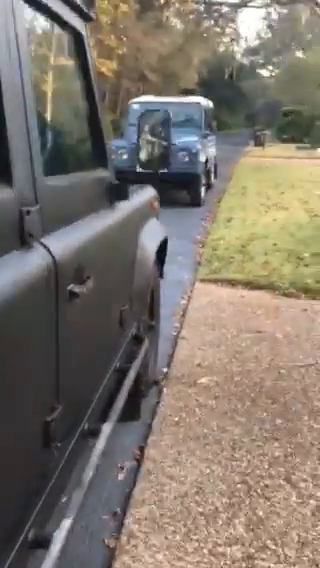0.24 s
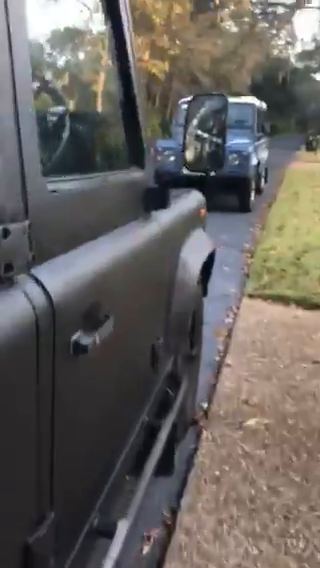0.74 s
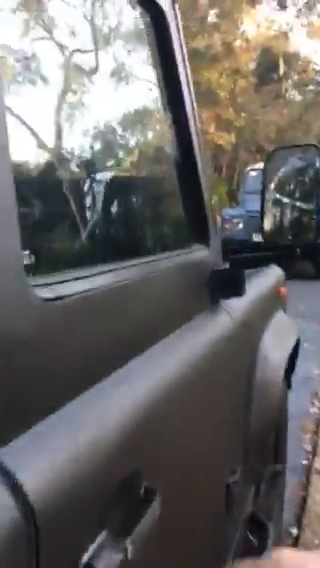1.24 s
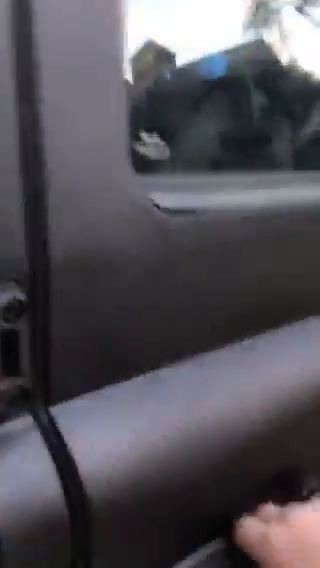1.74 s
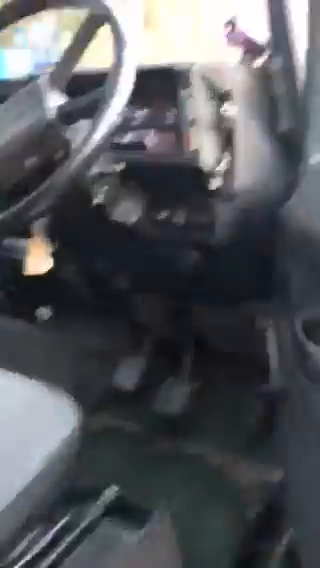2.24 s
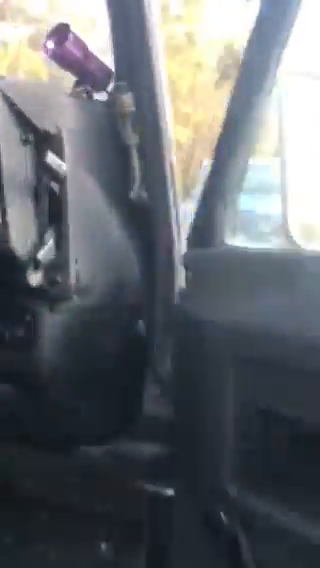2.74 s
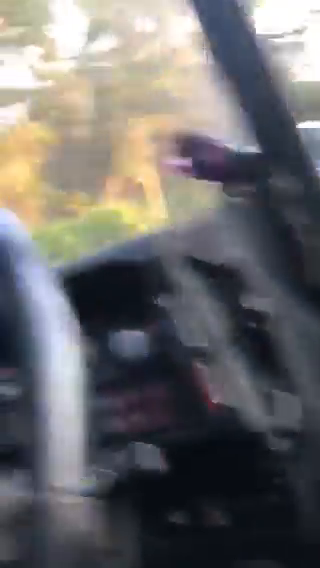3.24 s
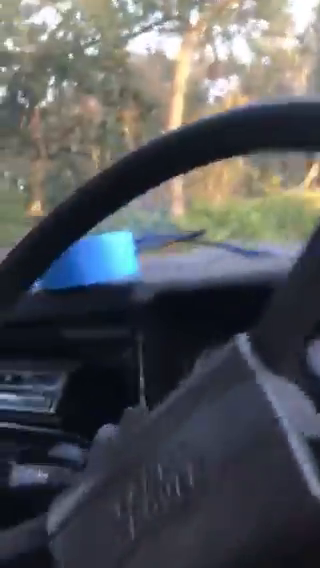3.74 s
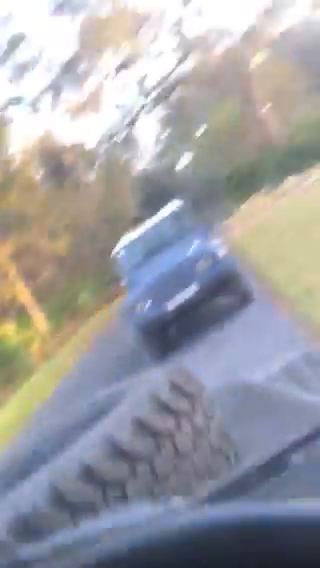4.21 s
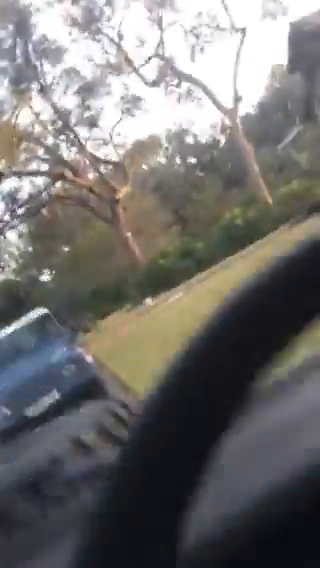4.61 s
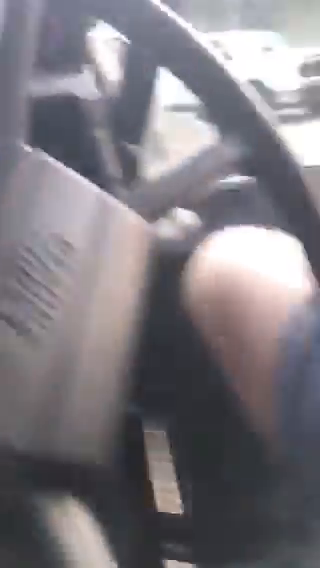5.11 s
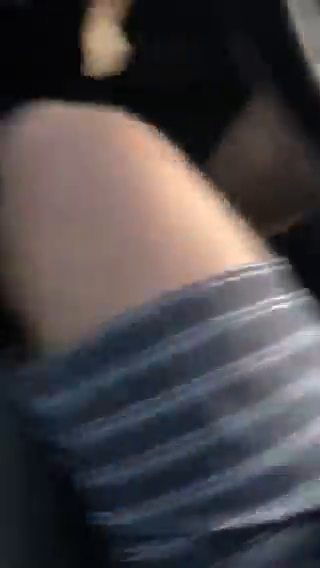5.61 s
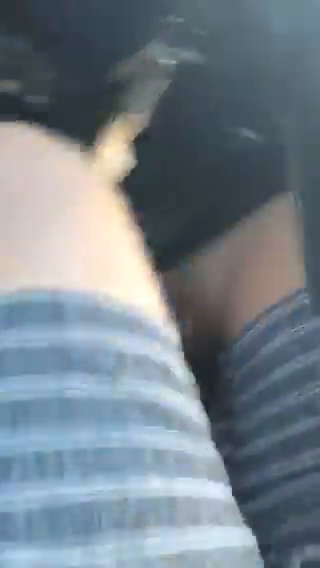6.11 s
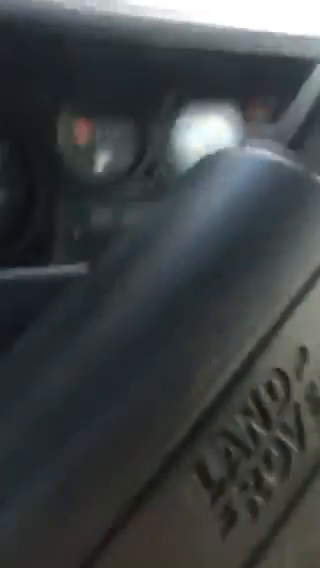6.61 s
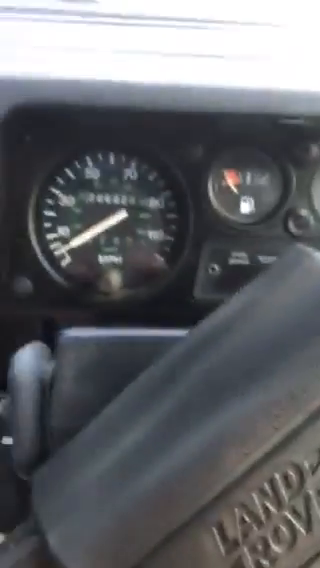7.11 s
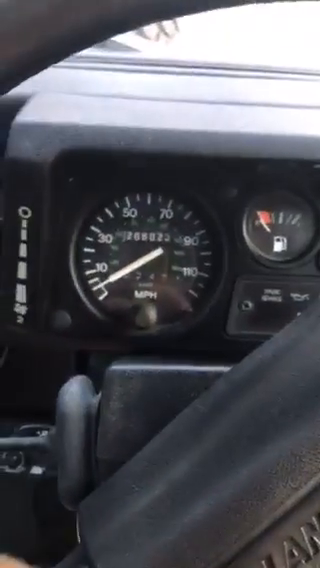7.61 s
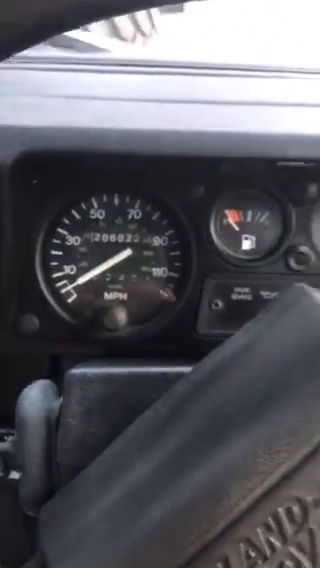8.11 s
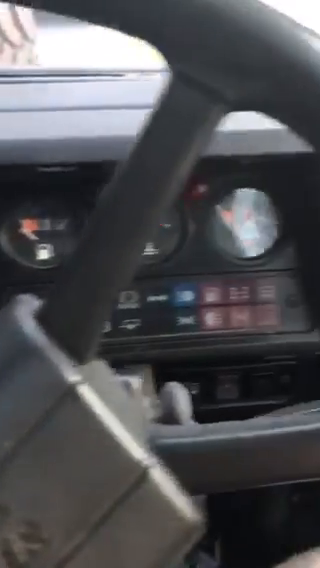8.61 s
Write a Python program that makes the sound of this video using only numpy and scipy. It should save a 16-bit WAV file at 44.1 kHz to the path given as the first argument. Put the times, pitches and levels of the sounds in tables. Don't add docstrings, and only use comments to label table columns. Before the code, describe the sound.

Handle clicks, latch clack, seat creaks and deep body thuds lead to a booming, rattling car door slam, then quiet cabin rumble.

```python
import sys
import numpy as np
from scipy import signal
from scipy.fft import rfft, irfft
from scipy.io import wavfile
from scipy.ndimage import uniform_filter1d

SR = 44100
rng = np.random.default_rng(int(sys.argv[2]) if len(sys.argv) > 2 else 0)


def decibels_to_gain(level_db):
    exponent = np.asarray(level_db, float) / 20
    return 10 ** exponent


def transcribe(u):
    v = np.clip(np.atleast_2d(u).T, -1, 1)
    q = np.round(v * 32767).astype(np.int16)
    wavfile.write(sys.argv[1], SR, q)


N = 390417
TIME = np.arange(N) / SR

# time in s, firing rate in Hz, level in dB, favoured harmonic (number).
ENGINE_DRONE = [(0, 38.3, -59.5, 3.7), (1.2, 38.26, -49, 2.2), (2.3, 37.93, -51, 2.5),
                (3.0, 36.92, -52.5, 3.13), (3.8, 40.24, -51, 2.8), (4.5, 39, -67.5, 1.14),
                (6.9, 38, -52.5, 1.63), (7.2, 37.4, -48, 1.97), (7.7, 37.68, -46, 2.47),
                (8.1, 37, -47, 2.35), (8.4, 35.25, -55.5, 2), (8.85, 32.15, -53, 2.58)]
OFF_RESONANCE_DB = -12

# time in s, level in dB.
ROAD_HISS = [(0.0, -53), (.49, -53.5), (1.08, -55), (1.85, -53), (2.56, -56.5), (2.98, -55), (3.72, -59.5),
             (4.26, -55.5), (4.51, -60.5), (4.88, -55.5), (5.4, -61.5), (5.84, -60.5), (6.16, -50),
             (6.28, -60.5), (6.6, -65), (7.05, -65.5)]
# frequency in Hz, density in dB per Hz.
TYRE_SPECTRUM = [(150, -38.5), (260, -5), (416, -2.5), (471, -7), (513, -3), (801, 1), (1210, -3.5),
                 (1360, -4), (2130, -15.5), (5000, -38), (6500, -64), (11000, -120)]
# frequency in Hz, density in dB per Hz.
RUMBLE_SPECTRUM = [(11, -64.5), (18, -28), (40, -2), (70, 0), (125, -13.5), (165, -15.5), (220, -20.5),
                   (300, -41.5), (420, -67.5)]
# time in s, level in dB.
BODY_RUMBLE = [(0, -57), (1.8, -50.5), (2.9, -48.5), (3.7, -56), (4.4, -51.5), (5.0, -47.5), (5.4, -60),
               (6.5, -46.5), (7.0, -59.5), (8.1, -60.5), (8.85, -55)]
# frequency in Hz, density in dB per Hz.
STILL_SPECTRUM = [(150, -29), (250, -6), (400, -5), (800, -4), (1400, -10), (2000, -14.5), (5000, -18.5),
                  (15100, -24), (16500, -36)]
DEEP_DB, STILL_DB = -49, -70.5
SHUDDER_S, SHUDDER_POWER, SHUDDER_DEEP_DB, SHUDDER_UPPER_DB = 0.12, 0.57, -29, -33

# peak time in s, rise in s, fall in s, level in dB, brightness in dB.
CLOTH_STROKES = [(.001, .1, 0.21, -70, -1), (.5, 0.35, 0.37, -73, -0.5), (1.15, 0.16, 0.24, -67, 0.5),
                 (1.75, 0.26, .15, -67, -2.5), (2.03, 0.51, 0.57, -67, -0.5), (2.98, 0.27, 0.2, -57.5, 4.5),
                 (3.47, 0.31, 0.28, -63, 4.5), (4.2, 0.26, 0.34, -60, 0.5), (4.65, 0.23, 0.6, -64.5, 1.5),
                 (4.97, 0.11, 0.12, -63, 6), (5.15, 0.1, 0.06, -62.5, 5.5), (5.29, 0.15, .12, -67.5, 8),
                 (5.62, 0.24, 0.95, -67.5, 4), (6.03, 0.19, 0.23, -53, -6), (6.5, 0.23, 0.4, -67, 2),
                 (6.79, 0.18, .17, -63, 2.5)]
# frequency in Hz, density in dB per Hz.
CLOTH_SPECTRUM = [(710, -33), (1200, -17), (1700, -2.5), (1920, -0.5), (2980, -2.5), (5160, -5.5),
                  (6150, -10), (6940, -7.5), (7660, -10.5), (8640, -7.5), (14300, -9.5), (16000, -12),
                  (16500, -41.5)]
STROKE_EDGE_DB, STROKE_POWER, FIDGET_DB, FIDGET_TOP_DB = -16, 2.05, -73.5, -81.5

# start in s, end in s, pitch in Hz, level in dB, half width as share of pitch.
SPRING_CREAKS = [(3.775, 3.825, 2030, -52.5, .03), (3.83, 3.91, 2780, -50, 0.013),
                 (3.79, 3.88, 5350, -57.5, .015), (3.92, 4.08, 2640, -55, .022),
                 (4.17, 4.36, 1950, -56, .08), (4.24, 4.37, 900, -52, .08), (4.52, 4.72, 2000, -58, .07),
                 (3.92, 4.0, 1950, -54, .04), (3.82, 3.86, 926, -48.5, 0.027), (3.81, 3.9, 1410, -49, .04),
                 (3.83, 3.9, 2310, -50, .04), (3.81, 3.9, 3650, -60, .04), (3.77, 3.9, 657, -49.5, .08),
                 (3.83, 3.92, 1800, -52, .05), (4.15, 4.39, 280, -54, .08), (2.82, 3.04, 1950, -55, 0.061),
                 (2.94, 3.06, 5200, -53, .08), (4.92, 5.0, 2050, -56, 0.054),
                 (3.79, 3.9, 8100, -61.5, 0.056), (3.79, 3.9, 12500, -63, .05),
                 (2.95, 3.03, 2600, -55, .06), (8.745, 8.84, 590, -60.5, 0.037)]

# frequency in Hz, level in dB, t60 in s.
HANDLE = [(385, -2, 0.06), (680, -8, 0.05), (894, -17, .08), (1100, -8, .06), (1485, -12, .045),
          (1868, -15, .035), (2229, -11, .045), (2450, -12, .02), (3140, -11.5, .04)]
# frequency in Hz, level in dB, t60 in s.
BOLT = [(262, -1, .075), (590, -9, 0.059), (850, -17, .05), (1122, -13, .05), (1400, -15.5, .04)]
# frequency in Hz, level in dB, t60 in s.
SILL = [(800, -7.5, .06), (1115, -4, .03), (1730, -2.5, .028), (2150, -13, .025), (3820, -17, .03)]
# frequency in Hz, level in dB, t60 in s.
STEP = [(826, -0.5, 0.035), (1145, -5.5, 0.022), (1575, -3, 0.032), (2150, -9.5, .03), (4021, -11, 0.034),
        (4888, -16, .03), (5600, -17, .02)]
# frequency in Hz, level in dB, t60 in s.
COLUMN = [(298, -1, 0.052), (502, -6.5, .05), (670, -1.5, 0.052), (940, -12, 0.042), (1310, -14.5, .045),
          (1950, -22, .03)]
# frequency in Hz, level in dB, t60 in s.
SEAT_BASE = [(200, -1, .09), (384, -12, 0.0695)]
# frequency in Hz, level in dB, t60 in s.
CLIP = [(1760, -0.5, 0.041), (2054, -4, 0.026), (3700, -16, .04)]
# frequency in Hz, level in dB, t60 in s.
SEAT_TRIM = [(348, -1, 0.097), (453, -5.5, .06), (247, -7, 0.071)]
# frequency in Hz, level in dB, t60 in s.
BUCKLE = [(190, -2, .07), (330, 0, .05), (460, -2, .05), (650, -4, .045), (920, -6, .04), (1200, -9, .04)]
# frequency in Hz, level in dB, t60 in s.
DASH = [(589, -3, 0.074), (1150, -9, .04), (2000, -9.5, .03), (2560, -15, .02)]
# start in s, peak in dB, push in s, modes of the part struck.
BLOWS = [(1.876, -28, .0006, HANDLE), (1.8793, -19, 0.00055, HANDLE), (1.9946, -25, 0.00093, BOLT),
         (1.999, -21.5, 0.00085, BOLT), (3.113, -35, 0.00057, SILL), (3.1943, -38, 0.00032, STEP),
         (3.4155, -39.5, .0005, STEP), (3.066, -38.5, 0.00089, BOLT), (4.5755, -29, .001, COLUMN),
         (4.5786, -26.5, 0.0018, COLUMN), (4.642, -43.5, .0006, SILL), (5.73, -27.5, 0.0035, SEAT_BASE),
         (6.728, -30, .0015, BUCKLE), (6.627, -44, .002, BUCKLE), (6.036, -20, .003, COLUMN),
         (5.981, -24, .003, COLUMN), (8.785, -59.5, 0.0029, DASH), (8.818, -63, .004, DASH),
         (1.9335, -40.5, .001, CLIP), (1.966, -45, .003, CLIP), (5.286, -38.5, .004, SEAT_TRIM),
         (5.326, -39.5, 0.0035, SEAT_TRIM), (2.7835, -46, .001, STEP)]
# start in s, peak in dB, low edge in Hz, high edge in Hz.
CATCH_SNAPS = [(6.6072, -16, 1220, 4040), (6.7305, -36, 1200, 5800), (6.8155, -43, 900, 3500),
               (3.4175, -35, 760, 2400), (3.196, -38, 700, 4900), (1.4935, -40, 12000, 14000),
               (1.5135, -39, 11500, 14500), (1.539, -37, 5500, 9000), (1.81, -37.5, 10000, 11000),
               (1.829, -38, 8500, 12000), (5.5405, -43, 2000, 7000), (1.2058, -40, 1500, 7600),
               (2.0953, -42, 2000, 7000), (2.1611, -40, 2500, 7000), (2.189, -32, 2800, 7100),
               (4.3, -48, 1200, 3500), (4.644, -40, 900, 4000), (5.5854, -44, 1500, 6000),
               (5.8103, -42.5, 3300, 4400), (6.2483, -40, 1500, 6000), (3.9005, -41, 3500, 8000)]

# start in s, peak in dB, ring in Hz.
BRIGHT_TICKS = [(.033, -40.5, 4300), (1.136, -39.5, 2020), (1.9879, -33.5, 4000), (2.126, -33, 1620),
                (2.162, -35.5, 3730), (2.1872, -26.5, 4160), (2.2127, -37, 1840), (2.6833, -45.5, 4200),
                (2.774, -38, 4300), (3.8092, -55, 2040), (4.1465, -43, 2380), (4.3395, -39, 2000),
                (4.57, -39, 1650), (5.586, -40.5, 2720), (5.7385, -46, 1520), (5.7548, -46.5, 6500),
                (5.7704, -41, 4100), (5.77, -44, 6800), (6.5331, -46, 4000), (6.599, -36, 2180),
                (6.6294, -38, 1570), (6.7044, -53, 4090)]
# start in s, peak in dB, ring in Hz.
DULL_TICKS = [(1.032, -42, 1760), (1.205, -37.5, 2000), (1.5998, -44, 1540), (2.095, -36.5, 2377),
              (2.7107, -45, 1730), (2.8125, -36, 4070), (3.2229, -45, 1840), (3.426, -41, 1600),
              (3.7864, -45, 2080), (3.9042, -30, 2070), (4.7416, -33.5, 2070), (5.809, -41, 3900),
              (5.821, -43.5, 3860)]
TICK_T60_S, BRIGHT_TOP_DB, DULL_TOP_DB, RATTLE_TOP_DB = 0.035, -8, -20, -10
# start in s, peak in dB, ring in Hz, t60 in s, top octaves in dB.
CLACKS = [(1.4916, -32.5, 2760, .072, -3), (1.5044, -29.5, 2830, .09, -10), (1.518, -28, 1830, 0.066, -5.5),
          (1.528, -33, 2920, .04, -18), (1.5385, -28, 2630, 0.018, -12), (1.8086, -25.5, 3230, 0.051, -4.5),
          (1.826, -25.5, 3080, 0.045, -7.5), (1.8787, -26, 4200, 0.046, -12), (1.897, -36, 3600, .08, -8),
          (1.93, -39, 4000, .09, -8), (1.8, -40, 3500, .05, -15), (2.0006, -25, 2950, .054, -9),
          (2.0212, -16, 4070, 0.025, 3.5), (2.0215, -29, 1400, .04, -30), (2.031, -24, 4200, .03, 0),
          (5.5398, -39, 3850, 0.012, -6), (6.6066, -29, 3300, 0.015, -22), (6.7276, -30.5, 1040, .04, -10)]
# start in s, peak in dB, ring in Hz, t60 in s.
SLAM_RATTLES = [(5.9696, -19, 2000, .07), (5.971, -21, 4500, .1), (5.976, -21, 2700, .08),
                (5.9924, -12, 3400, .05), (5.9965, -12, 2300, .06), (6.0041, -14, 2100, .05),
                (6.011, -13, 3000, 0.04), (6.016, -12, 3600, .04), (6.028, -11.5, 4460, .04),
                (6.035, -18.5, 3500, .05), (6.0474, -20, 2890, 0.11), (6.073, -22, 4300, 0.11),
                (6.074, -23, 2300, .04), (6.109, -26.5, 3270, 0.073), (6.141, -33, 3500, 0.14),
                (6.156, -39, 3000, .1), (6.2, -45, 3000, .06), (6.247, -35, 3070, 0.22),
                (6.2802, -34.5, 2750, 0.094), (6.305, -39.5, 3000, 0.066)]
# frequency in Hz, width in Hz, level in dB.
LATCH_BANDS = [(8800, 1100, 1.5), (11450, 600, -4.5), (14670, 200, -4.5)]
# start in s, peak in dB, t60 in s.
LATCH_HITS = [
    (2.021, -26.5, .028),
    (2.031, -35, .03),
    (5.993, -36, .05),
    (6.013, -36.5, .06),
]

# start in s, peak in dB, upper ring in Hz, upper level in dB.
SKIN_KNOCKS = [(2.049, -39.5, 760, -20), (2.189, -33.5, 1327, -6), (2.783, -39, 692, -0.5),
               (4.91, -47, 806, 4.5), (5.557, -37.5, 553, -7), (5.745, -36.5, 420, -5),
               (5.992, -10, 1140, -12), (6.013, -9.5, 747, -4.5), (6.039, -12.5, 744, -3.5),
               (6.073, -19.5, 898, -6), (6.1, -25, 880, -15), (6.602, -28, 1350, -12)]
# start in s, peak in dB, upper ring in Hz, upper level in dB.
TRIM_KNOCKS = [
    (1.505, -29, 700, -6),
    (1.826, -30.5, 1350, -4),
    (3.898, -29, 707, -12),
    (5.593, -30.5, 947, -33),
    (5.97, -23, 696, 5.5),
    (6.629, -49, 875, -22),
]
# start in s, peak in dB, upper ring in Hz, upper level in dB.
PLASTIC_KNOCKS = [
    (6.251, -48, 1100, -2),
]
SKIN_HZ, SKIN_T60_S = 270, 0.069
TRIM_HZ, TRIM_T60_S = 380, 0.07
PLASTIC_HZ, PLASTIC_T60_S = 470, 0.06

# start in s, peak in dB, pitch in Hz, t60 in s.
AIR_PUSHES = [
    (1.872, -34.5, 47, 0.34),
    (2, -45, 45.4, 0.67),
    (6.75, -38, 42, 0.95),
    (5.99, -17.5, 32, .6),
]

# start in s, peak in dB, panel in Hz, t60 in s, overtone in dB.
FLOOR_THUDS = [(2.792, -54, 67.3, .95, 16.5), (3.068, -42.5, 58.9, 0.21, -26), (3.9, -14.5, 89, 0.25, -9),
               (3.913, -13, 74.6, 0.34, 4), (3.945, -22.5, 76.5, 0.28, 2.5), (3.981, -33, 69.7, 0.41, 8.5),
               (5.109, -21.5, 63.8, 0.908, -15.5), (5.289, -11.5, 69.5, 0.56, -7),
               (5.33, -19, 86.7, .16, -7), (5.366, -32.5, 74.3, 0.53, 0.5), (5.558, -27, 99, .43, -6.5),
               (5.581, -31, 102, .16, 2.5), (5.604, -31.5, 69.4, 0.298, -11.5),
               (5.734, -16, 76.3, 0.17, -11), (5.809, -31.5, 72.4, 0.44, -17),
               (6.734, -38.5, 99.6, 0.7, 11.5), (8.775, -49, 90, .5, 3)]
# start in s, peak in dB, panel in Hz, t60 in s, overtone in dB.
DOOR_THUDS = [
    (1.873, -31, 93, 0.16, 4),
    (1.993, -31, 99, 0.18, 9),
    (2.049, -34.5, 101, 0.16, 5.5),
    (2.576, -47, 66.3, 0.32, 7),
    (2.829, -44, 109.8, 0.4, 9.5),
    (6.605, -29.5, 71.4, 0.053, 7.5),
    (6.765, -39, 94, 0.54, 4.5),
]
# start in s, peak in dB, panel in Hz, overtone in Hz.
SLAM_THUDS = [
    (5.974, -15.5, 61, 130),
    (5.993, -18.5, 70, 172),
    (6.007, -8, 69, 135),
    (6.035, -11, 53.5, 110),
    (6.055, -12, 58, 175.5),
    (6.16, -24.5, 58.8, 136),
    (6.282, -29, 57.8, 145),
]
FLOOR_OVER_HZ, DOOR_OVER_HZ = 126.6, 195
SLAM_T60_S, SLAM_OVER_DB, SLAM_DULLS_DB_PER_S = 0.36, 0, 76

TOP_HZ = 15900
PORT_DIP_HZ, PORT_DIP_Q, PORT_DIP_SHARE = 10370, 18, 0.39


def band(x, lo_hz, hi_hz, order=2):
    return signal.sosfilt(signal.butter(order, [lo_hz, min(hi_hz, 0.45 * SR)], "band", fs=SR, output="sos"), x)


def split(x, edge_hz):
    return [signal.sosfilt(signal.butter(4, edge_hz, kind, fs=SR, output="sos"), x) for kind in ("low", "high")]


def unit(x):
    return x / np.sqrt(np.mean(x ** 2))


def coloured(x, points, lo_hz=0, hi_hz=1e5):
    hz = np.fft.rfftfreq(N, 1 / SR) + 1e-3
    point_hz, point_db = np.transpose(points)
    spec = rfft(x) * decibels_to_gain(np.interp(np.log(hz), np.log(point_hz), point_db, -120, -120))
    inside = (hz > lo_hz) * (hz < hi_hz)
    return irfft(spec, N) / np.std(irfft(spec * inside, N))


def walk(rate_hz):
    hold = int(SR / rate_hz)
    levels = np.repeat(rng.standard_normal(N // hold + 1), hold)
    return 1.2 * uniform_filter1d(levels, hold)[:N]


def curve(rows):
    s, *columns = np.transpose(rows)
    return [np.interp(TIME, s, column) for column in columns]


def fade(t, t60_s, rise_s):
    env = (1 - np.exp(-t / rise_s)) ** 2 * np.exp(-np.log(1000) * t / t60_s)
    return env / env.max()


def add(out, s, x):
    i = int(s * SR)
    out[i:i + len(x)] += x[:N - i]


def sine(hz, t):
    return np.sin(2 * np.pi * hz * t)


def engine_drone():
    hz, db, favoured = curve(ENGINE_DRONE)
    phase = 2 * np.pi * np.cumsum(hz * (1 + 0.006 * walk(3.1))) / SR
    out = np.zeros(N)
    for k in (2, 3, 4):
        level_db = db + OFF_RESONANCE_DB * np.abs(k - favoured) + walk(5)
        out += np.sqrt(2) * decibels_to_gain(level_db) * np.sin(k * phase + k)
    return out


def road(booms):
    hiss_db, = curve(ROAD_HISS)
    upper_db, = curve(BODY_RUMBLE)
    hiss_gate = np.clip((7.05 - TIME) / 0.22, 0, 1)
    hiss = coloured(rng.standard_normal(N), TYRE_SPECTRUM, 350.2, 2000)
    hiss = hiss_gate * decibels_to_gain(hiss_db + walk(11)) * hiss

    keep = np.exp(-1 / (SHUDDER_S * SR))
    shudder = signal.lfilter([1 - keep], [1, -keep], np.abs(booms)) ** SHUDDER_POWER
    deep, upper = split(coloured(rng.standard_normal(N), RUMBLE_SPECTRUM), 100)
    deep_level = np.hypot(decibels_to_gain(DEEP_DB - 3 + 1.1 * walk(2.8)), decibels_to_gain(SHUDDER_DEEP_DB) * shudder)
    upper_level = np.hypot(decibels_to_gain(upper_db - 1 + 2.2 * walk(1.9)), decibels_to_gain(SHUDDER_UPPER_DB) * shudder)
    still = decibels_to_gain(STILL_DB) * coloured(rng.standard_normal(N), STILL_SPECTRUM)
    return hiss + deep_level * unit(deep) + upper_level * unit(upper) + still


def cloth_rustle():
    mid, top = decibels_to_gain(FIDGET_DB), decibels_to_gain(FIDGET_TOP_DB)
    for s, rise_s, fall_s, db, bright_db in CLOTH_STROKES:
        away = np.where(TIME < s, (s - TIME) / rise_s, (TIME - s) / fall_s)
        stroke = decibels_to_gain(db + STROKE_EDGE_DB * away ** STROKE_POWER)
        mid = np.hypot(mid, stroke)
        top = np.hypot(top, decibels_to_gain(bright_db) * stroke)
    moving = np.clip((7.0 - TIME) / 0.072, 0, 1)
    grains = rng.standard_normal(N) * decibels_to_gain(1.8 * rng.exponential(size=N))
    low, high = split(coloured(grains, CLOTH_SPECTRUM, 3100, 6000), 6400)
    return moving * (mid * decibels_to_gain(0.5 * walk(25)) * low + top * decibels_to_gain(-3 + 1.2 * walk(25)) * unit(high))


def spring_creaks():
    out = np.zeros(N)
    for start, end, hz, db, wide in SPRING_CREAKS:
        size = int((end - start) * SR)
        noise = rng.standard_normal((2, SR // 3))
        squeak = unit(band(noise[0], hz / (1 + wide), hz * (1 + wide)))
        scrape = decibels_to_gain(-1.5) * unit(band(noise[1], 0.37 * hz, 1.58 * hz))
        flutter = 1 + 0.01 * unit(band(noise[1], 8, 60))
        sing = decibels_to_gain(4 - 300 * wide) * np.sin(2 * np.pi * hz * np.cumsum(flutter) / SR)
        creak = (squeak + scrape + sing)[-size:]
        add(out, start, decibels_to_gain(db - 6.5) * signal.windows.tukey(size, 0.4) * creak)
    return out


def part_blows():
    out, t = np.zeros(N), TIME[:SR // 4]
    for s, db, push_s, modes in BLOWS:
        for hz, mode_db, t60_s in modes:
            scatter = decibels_to_gain(-7) * unit(band(rng.standard_normal(len(t)), 0.85 * hz, 1.17 * hz))
            ring = sine(hz * (1 + 0.0071 * rng.standard_normal()), t) + scatter
            add(out, s, decibels_to_gain(db + mode_db) * ring * fade(t, t60_s, push_s))
    return out


def catch_snaps():
    out, t = np.zeros(N), TIME[:SR // 4]
    for s, db, lo_hz, hi_hz in CATCH_SNAPS:
        click = band(1.0 * (t == 0), lo_hz, hi_hz)
        add(out, s, -decibels_to_gain(db) * click / click.max())
    return out


def metal_ticks():
    out, t = np.zeros(N), TIME[:SR // 4]
    hits = list(CLACKS)
    hits += [(*row, RATTLE_TOP_DB) for row in SLAM_RATTLES]
    hits += [(*row, TICK_T60_S, BRIGHT_TOP_DB) for row in BRIGHT_TICKS]
    hits += [(*row, TICK_T60_S, DULL_TOP_DB) for row in DULL_TICKS]
    for s, db, hz, t60_s, top_db in hits:
        noise = rng.standard_normal((2, len(t)))
        crack = band(1.0 * (t == 0), 0.45 * hz, 1.9 * hz, order=3)
        crack = decibels_to_gain(-2.5) * crack / crack.max()
        ring = decibels_to_gain(-8) * sine(hz, t) * fade(t, 0.63 * t60_s, 0.00044)
        rattle = unit(band(noise[0], 0.5 * hz, 1.387 * hz, order=3))
        rattle = decibels_to_gain(-7) * rattle * fade(t, t60_s, 0.00043)
        top = unit(band(noise[1], 4500, 10000)) * fade(t, 1.2 * t60_s, 0.00027)
        add(out, s, decibels_to_gain(db - 5) * (crack + ring + rattle + decibels_to_gain(top_db - 8) * top))
    return out


def latch_rings():
    out, t = np.zeros(N), TIME[:SR // 4]
    for s, hit_db, t60_s in LATCH_HITS:
        for hz, wide_hz, db in LATCH_BANDS:
            ring = unit(band(rng.standard_normal(len(t)), hz - wide_hz / 2, hz + wide_hz / 2))
            add(out, s, decibels_to_gain(hit_db + db) * ring * fade(t, t60_s, 0.000606))
    return out


def panel_knocks():
    out, t = np.zeros(N), TIME[:SR // 3]
    parts = ((SKIN_KNOCKS, SKIN_HZ, SKIN_T60_S), (TRIM_KNOCKS, TRIM_HZ, TRIM_T60_S),
             (PLASTIC_KNOCKS, PLASTIC_HZ, PLASTIC_T60_S))
    for rows, hz, t60_s in parts:
        for s, db, up_hz, up_db in rows:
            noise = rng.standard_normal((2, len(t)))
            low = sine(hz, t) + decibels_to_gain(-2.5) * unit(band(noise[0], 0.49 * hz, 1.56 * hz))
            high = sine(up_hz, t) + unit(band(noise[1], 0.65 * up_hz, 1.46 * up_hz))
            low = low * fade(t, t60_s, 0.0026)
            high = decibels_to_gain(up_db) * high * fade(t, 2.2 * t60_s, 0.001)
            add(out, s, decibels_to_gain(db - 10) * (low + high))
    return out


def door_air():
    out, t = np.zeros(N), TIME[:SR]
    for s, db, hz, t60_s in AIR_PUSHES:
        add(out, s, decibels_to_gain(db) * fade(t, t60_s, 0.019) * sine(hz, t))
    return out


def panel_thuds():
    out, t = np.zeros(N), TIME[:SR]
    blows = [(*row, FLOOR_OVER_HZ) for row in FLOOR_THUDS]
    blows += [(*row, DOOR_OVER_HZ) for row in DOOR_THUDS]
    dulls_from_s = SLAM_THUDS[4][0]
    for s, db, hz, over_hz in SLAM_THUDS:
        over_db = SLAM_OVER_DB - SLAM_DULLS_DB_PER_S * max(s - dulls_from_s, 0)
        blows.append((s, db, hz, SLAM_T60_S, over_db, over_hz))
    blows.sort()
    stops = [row[0] for row in blows[1:]] + [N]
    for (s, db, hz, t60_s, over_db, over_hz), stop in zip(blows, stops):
        low = fade(t, t60_s, 0.012) * sine(hz, t)
        over = fade(t, min(0.32 * t60_s, 0.3), 0.0014) * sine(over_hz, t)
        damping = np.exp(-np.maximum(t + s - stop, 0) / 0.036)
        add(out, s, -decibels_to_gain(db + 0.5) * (low + decibels_to_gain(over_db) * over) * damping)
    return out


def scene():
    booms = panel_thuds()
    background = engine_drone() + road(booms) + cloth_rustle()
    hits = spring_creaks() + part_blows() + catch_snaps() + metal_ticks() + latch_rings() + panel_knocks()
    t = TIME[:SR // 3]
    tail = band(rng.standard_normal(len(t)), 160, 1600) * fade(t, 0.43, 0.0028)
    cabin = signal.fftconvolve(hits, tail / np.linalg.norm(tail))[:N]
    return (background + hits + decibels_to_gain(-24.5) * cabin + door_air() + booms)[None]


def top_cut(x):
    return signal.sosfilt(signal.butter(12, 16810, fs=SR, output="sos"), x)


def record(dry):
    dip = signal.lfilter(*signal.iirpeak(PORT_DIP_HZ, PORT_DIP_Q, SR), dry)
    port = dry - PORT_DIP_SHARE * dip
    limited = 0.95 * np.tanh(port / 0.78)
    mix = signal.sosfilt(signal.ellip(8, 0.2, 60, TOP_HZ, fs=SR, output="sos"), limited)
    return top_cut(mix)


dry = scene()
out = record(dry)
transcribe(out)
```